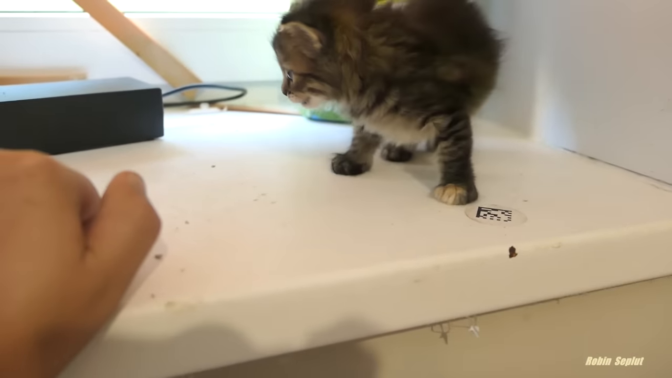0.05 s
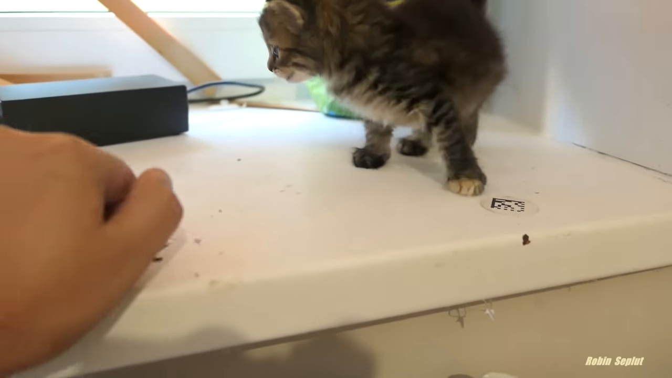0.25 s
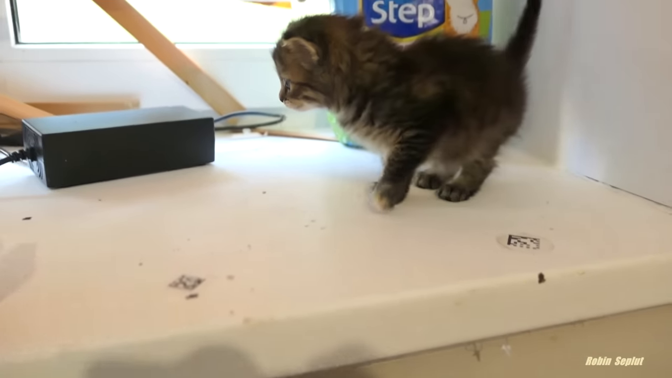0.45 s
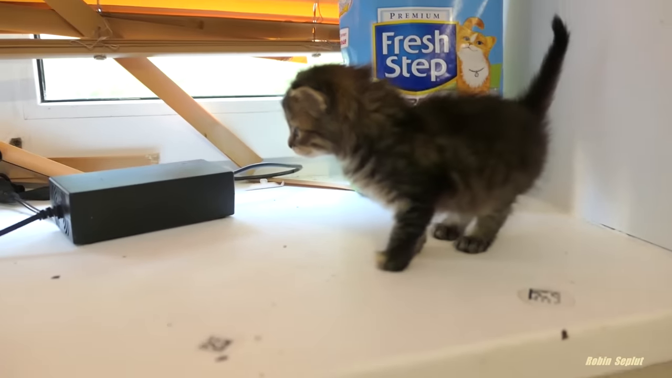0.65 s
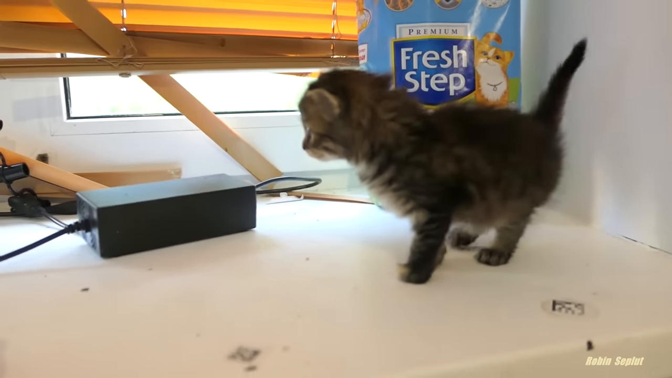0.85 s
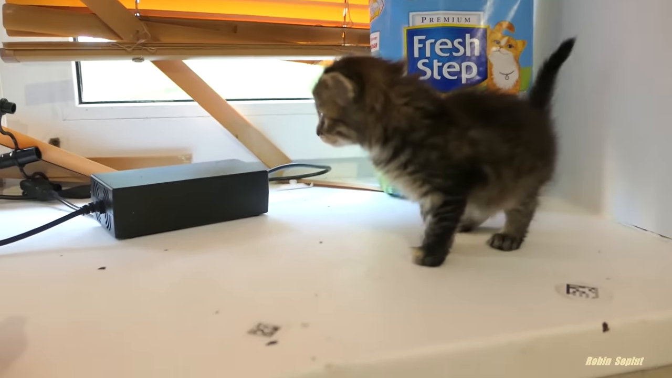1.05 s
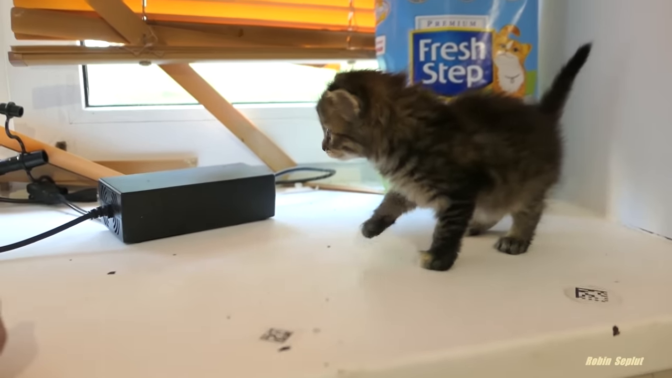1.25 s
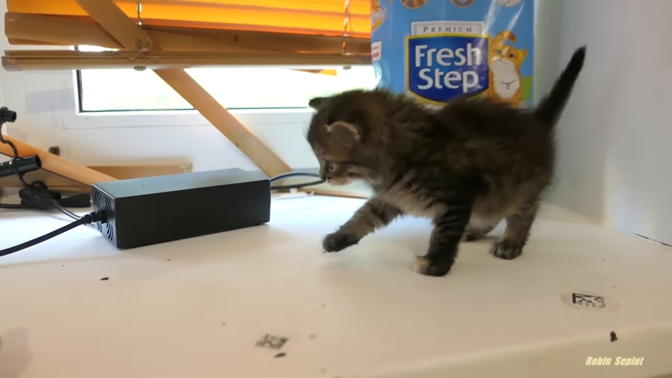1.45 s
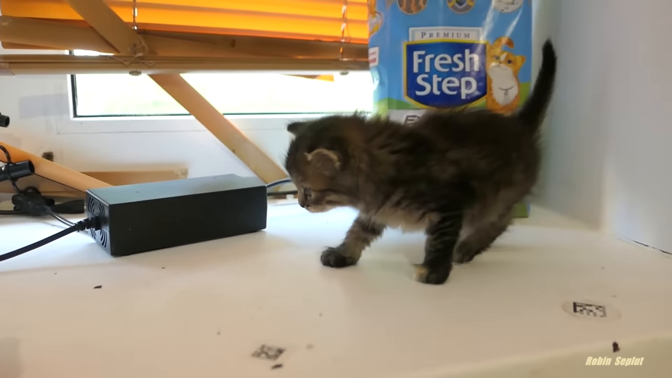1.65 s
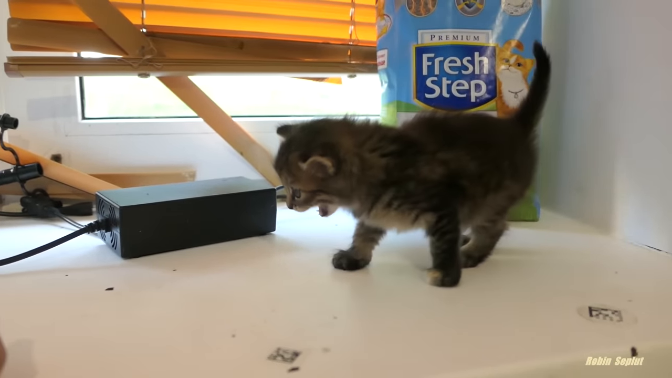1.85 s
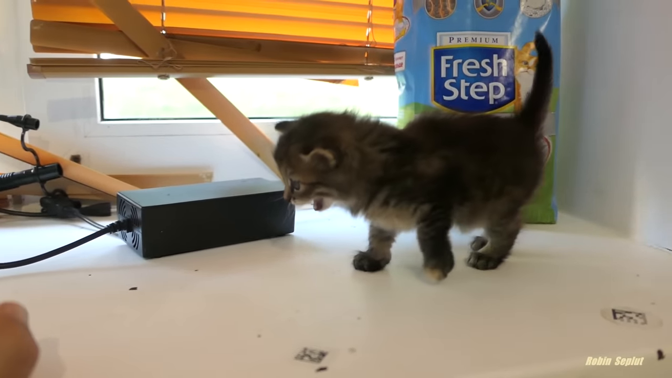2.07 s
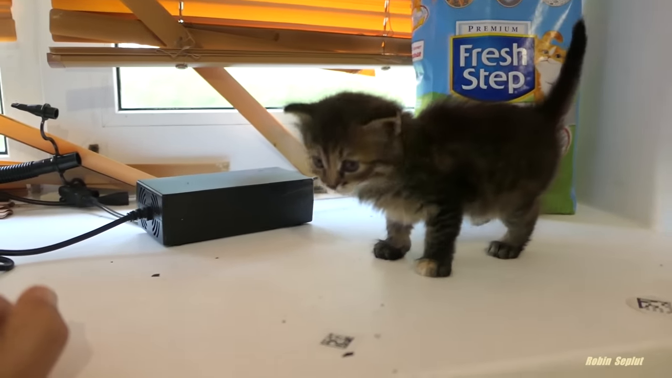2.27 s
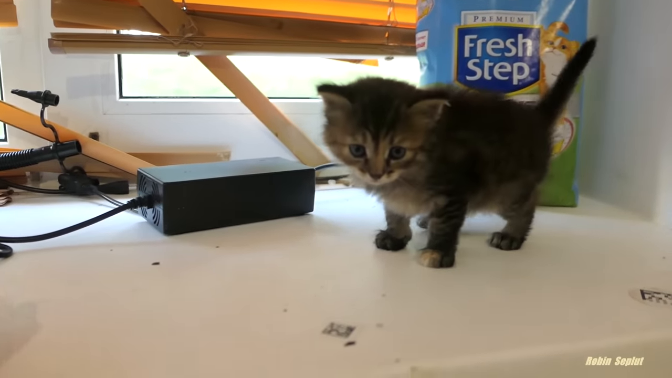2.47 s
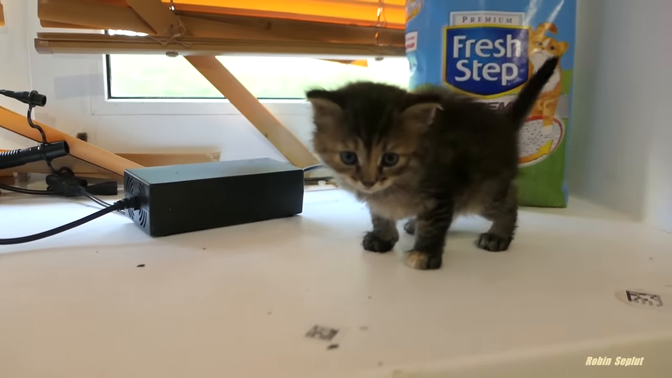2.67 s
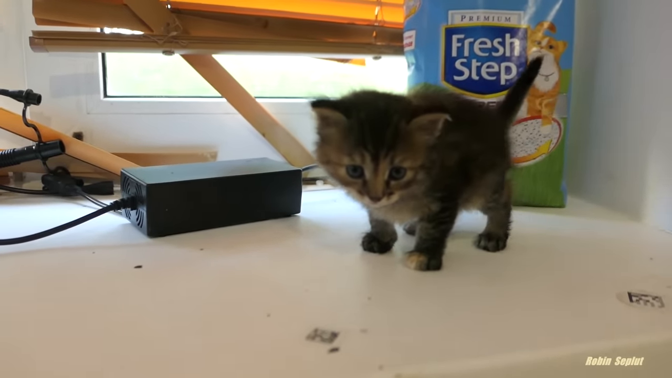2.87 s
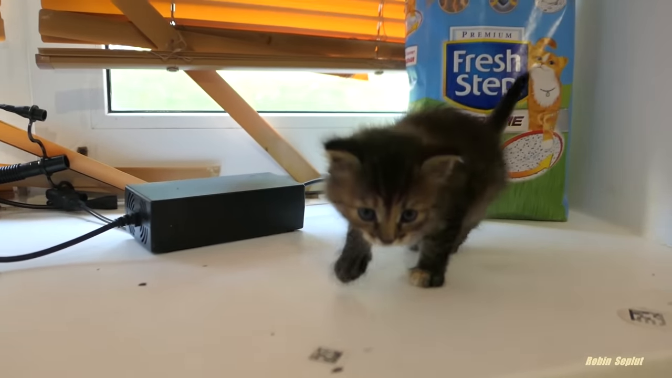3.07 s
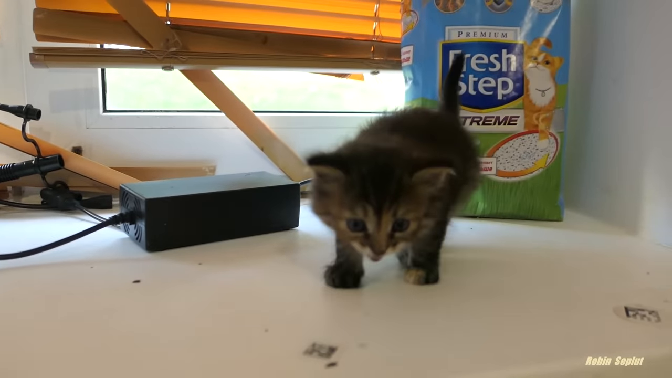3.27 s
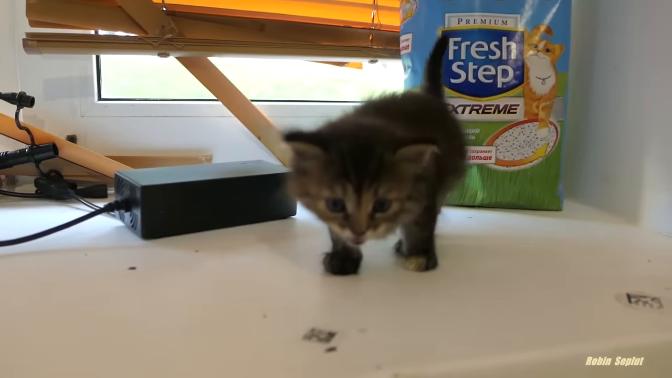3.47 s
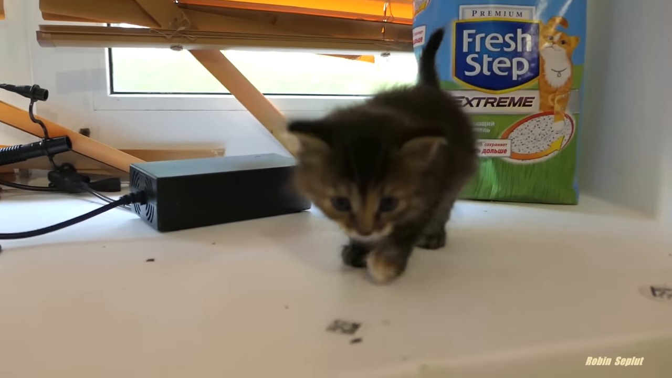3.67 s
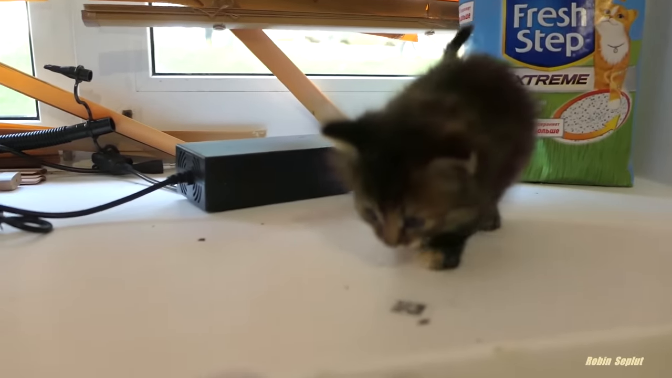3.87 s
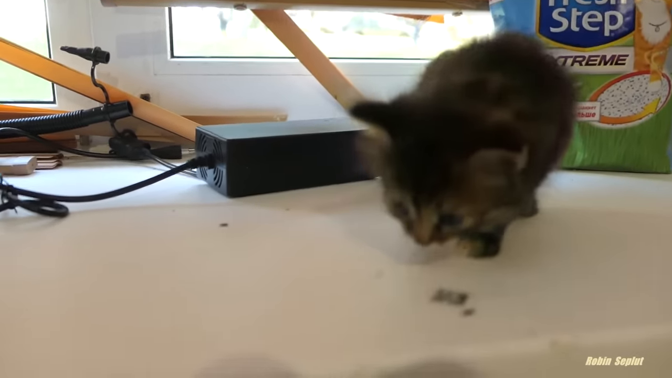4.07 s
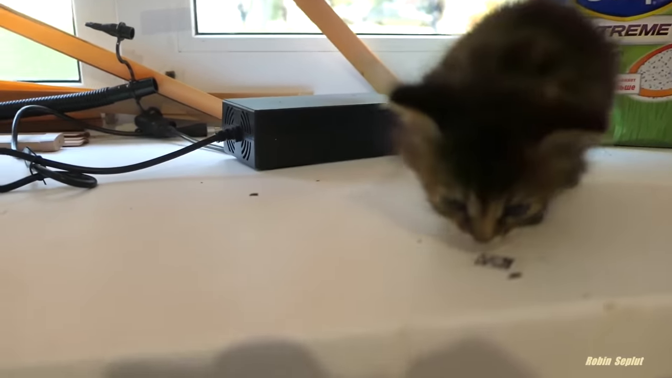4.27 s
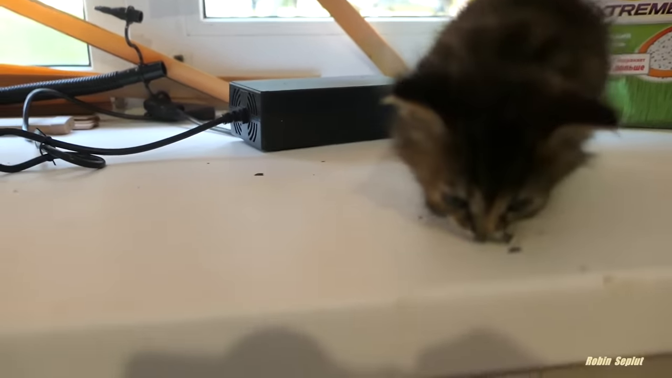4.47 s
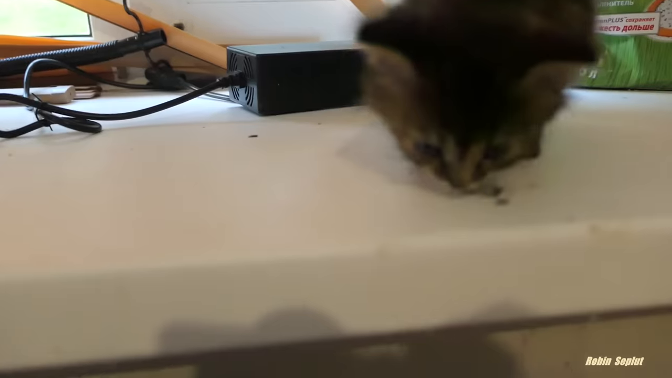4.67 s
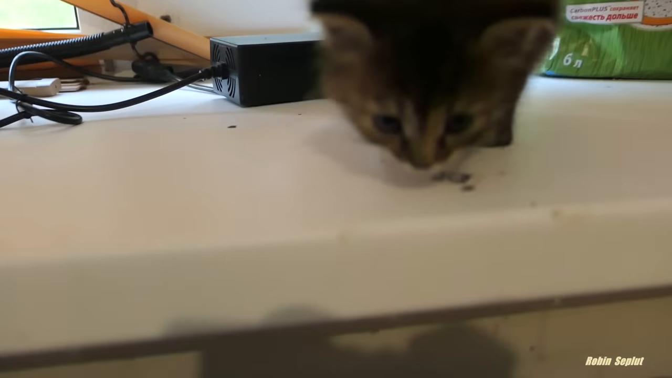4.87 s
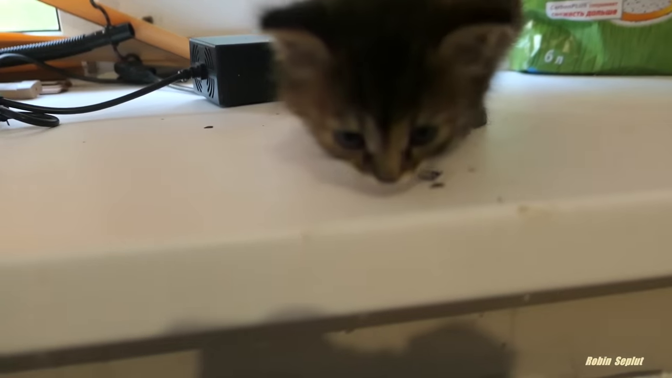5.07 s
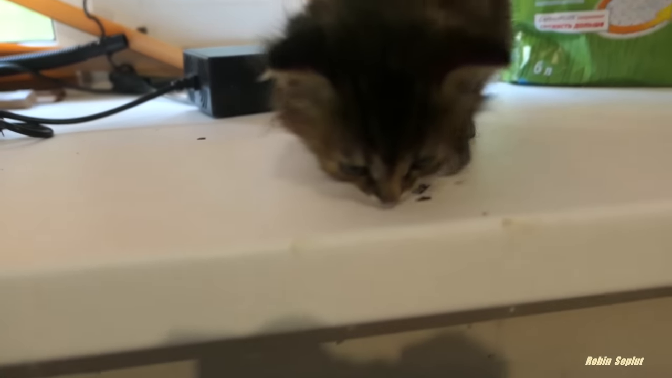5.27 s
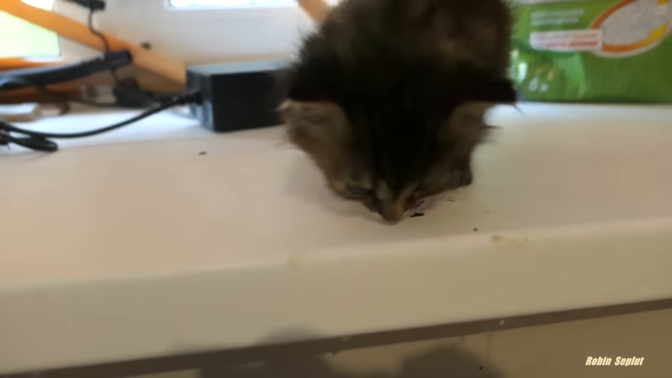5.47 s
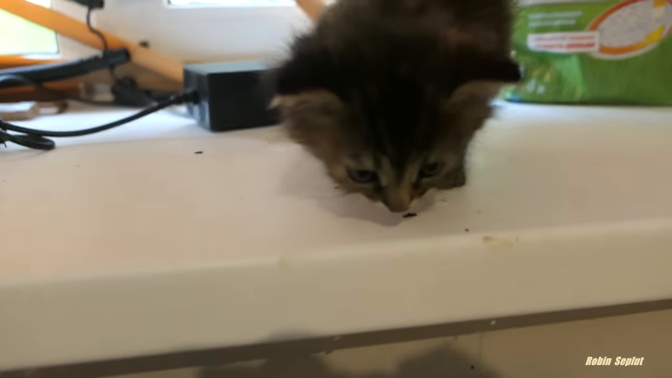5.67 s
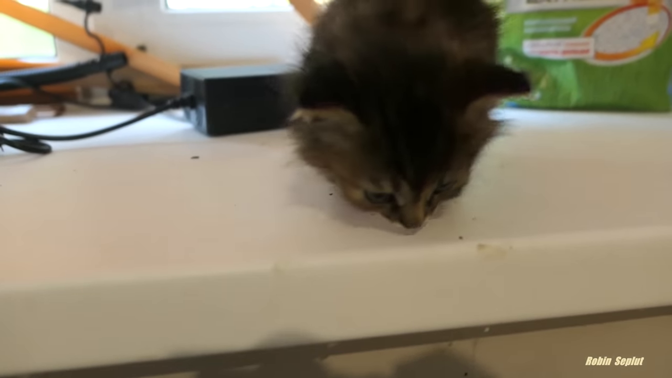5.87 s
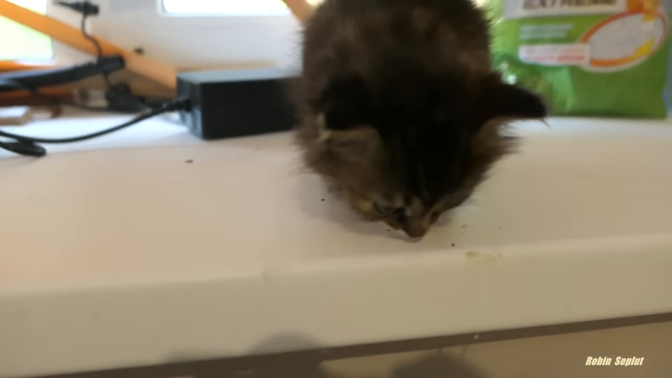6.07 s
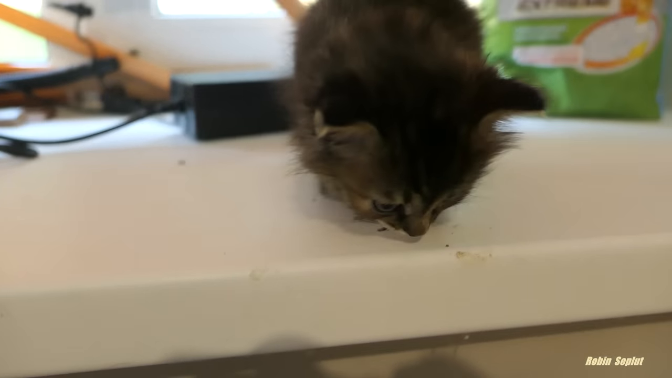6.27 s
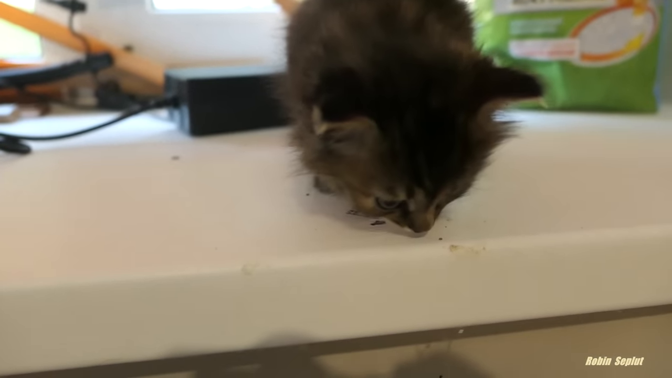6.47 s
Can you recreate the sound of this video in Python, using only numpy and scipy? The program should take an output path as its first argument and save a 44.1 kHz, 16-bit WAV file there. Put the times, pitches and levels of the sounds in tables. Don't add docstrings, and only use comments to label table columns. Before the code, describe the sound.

One hard wooden thump rings through a bare room, then a tiny kitten gives short, thin, raspy high cries over soft fan hum and traffic.

```python
import sys
import numpy as np
from scipy import signal
from scipy.fft import rfft, irfft
from scipy.io import wavfile
from scipy.ndimage import uniform_filter1d

SR = 44100
rng = np.random.default_rng(int(sys.argv[2]) if len(sys.argv) > 2 else 0)


def bounce(signal):
    frames = np.transpose(np.atleast_2d(signal))
    limited = np.clip(frames, -1, 1)
    pcm = np.round(limited * 32767).astype(np.int16)
    wavfile.write(sys.argv[1], SR, pcm)


def how_loud(loudness_db):
    steps = np.asarray(loudness_db, float) / 20
    return 10 ** steps


N = 287734


def evened(x):
    return x / np.sqrt(np.mean(x ** 2) + 1e-20)


def read(points, hz):
    f, value = np.transpose(points)
    return np.interp(np.log(hz + 1), np.log(f + 1), value)


def add(mix, start_s, sound):
    part = mix[:, round(start_s * SR):][:, :sound.shape[-1]]
    part += sound[..., :part.shape[1]]


def placed(sound, side_db):
    return np.array([sound * how_loud(side_db / 2), sound * how_loud(-side_db / 2)])


def drift(count, smooth):
    wander = rng.standard_normal(SR // 4)[:count]
    for _ in range(2):
        wander = uniform_filter1d(wander, int(smooth))
    return evened(wander)


# pitch_hz, likeness (-1 to 1)
LIKENESS = [(60, -0.57), (150, -0.66), (380, -0.65), (950, -0.15), (2380, -0.23), (5980, 0.51),
            (15000, 0.49)]
# pitch_hz, left_minus_right_db
LEFT_LEAN = [(60, 1.0), (180, -1.0), (550, 4.0), (1650, 2.0), (4970, 0.0), (15000, 0.0)]


def noise(shape_db, patchy_db):
    frames, hz = N // 512 + 5, np.fft.rfftfreq(2048, 1 / SR)
    a, b, c, d, patches = rng.standard_normal((frames, 1025, 5)).T
    patches = uniform_filter1d(patches, size=14, axis=0)
    patches = evened(uniform_filter1d(patches, size=7, axis=1))
    same = np.clip(read(LIKENESS, hz), -1, 1)[:, None]
    lean = how_loud(read(LEFT_LEAN, hz)[:, None] / 2)
    left = a + 1j * b
    right = same * left + np.sqrt(1 - same ** 2) * (c + 1j * d)
    z = np.array([left * lean, right / lean])
    z *= how_loud(shape_db(hz[:, None]) + patchy_db * patches)
    sound = signal.istft(z, nperseg=2048, noverlap=1536)[1]
    return evened(sound[:, 1024:N + 1024])


# pitch_hz, level_db (per Hz)
WASH = [(25, -35.5), (60, -30.5), (100, -33), (160, -1), (400, -2), (1000, -10.5), (2000, -18.5),
        (2700, -22), (4600, -25.5), (5300, -21.5), (7000, -23), (10000, -24.5), (13000, -29.5),
        (15800, -34)]


def steady_wash():
    return how_loud(-56.5) * noise(lambda hz: read(WASH, hz), patchy_db=0.3)


# pitch_hz, width_hz, level_db
DUCT = [(172, 95, -5), (612.3, 14.1, 6), (812.4, 50, 2.5), (1319, 138, -8.5), (1808, 113, -12)]


def fan_duct():
    def humps_db(hz):
        power = sum(how_loud(2 * db) / (1 + (2 * (hz - f) / width) ** 2) ** 2 for f, width, db in DUCT)
        return 10 * np.log10(power)
    return how_loud(-55) * noise(humps_db, patchy_db=0.4)


def passing(vehicles):
    t = np.arange(N) / SR
    power = sum(how_loud(2 * db) / (1 + ((t - nearest_s) / span_s) ** 2) ** 2 for nearest_s, db, span_s in vehicles)
    return np.sqrt(power)


# pitch_hz, level_db
STREET = [(150, -12), (300, 1), (550, -0.5), (1000, -9.5), (1350, 0.5), (1900, -13.5), (2400, -19),
          (3500, -28.5), (9000, -49)]
# nearest_s, level_db, passing_s
CARS = [(.15, -58, 0.35), (1.08, -54, 0.11), (2.05, -52.5, 0.26), (3.45, -55.5, 0.28), (3.88, -56.5, 0.061),
        (4.32, -53.5, 0.2), (5.79, -59.5, 0.21), (6.5, -58, 0.25)]


def street():
    return how_loud(4.5) * passing(CARS) * noise(lambda hz: read(STREET, hz), patchy_db=4.2)


# pitch_hz, level_db
WALLS = [(50, -33), (90, -24), (130, -1.5), (175, 0), (240, -13), (400, -43)]
# nearest_s, level_db, passing_s
LORRIES = [(1.7, -77, 1), (3.0, -69.5, 0.13), (3.6, -58, 0.15), (4.62, -65, .12), (5.9, -55, 0.24)]


def lorries():
    return how_loud(1.0) * passing(LORRIES) * noise(lambda hz: read(WALLS, hz), patchy_db=-1.0)


# pitch_hz, fade_s (time to fall 60 dB)
ROOM = [(100, 0.97), (300, 0.7), (1000, 0.73), (2000, .75), (3400, 0.58), (6000, 0.76), (9000, 0.37),
        (13000, 0.39)]


def room(x, gap_s, same):
    taps = np.zeros((2, SR))
    starts = np.arange(int(gap_s * SR), SR - 20, 20)
    at = starts + rng.integers(0, 20, (2, SR // 20))[:, :len(starts)]
    signs = rng.choice([-1., 1.], (2, SR // 20))[:, :len(starts)]
    np.put_along_axis(taps, at, signs, 1)
    same = np.clip(same, 0, 1)
    taps[1] = same * taps[0] + np.sqrt(1 - same ** 2) * taps[1]
    hz, t, z = signal.stft(taps, SR, nperseg=256)
    fading = how_loud(-60 * t / read(ROOM, hz)[:, None])
    tail = signal.istft(z * fading, SR, nperseg=256)[1]
    return signal.fftconvolve(x, tail / np.linalg.norm(tail[0]), axes=1)[:, :N]


# pitch_hz, level_db (per Hz)
WOOD = [(60, -91), (150, -6), (210, -8.5), (300, -6), (430, 0), (570, -3.5), (680, -10), (900, -4.5),
        (1050, -13), (1500, -24), (1800, -27), (2400, -37), (3700, -61.5), (9000, -60.5)]


def knock(db, side_db, ring_hz, bright_db, ring_db):
    t, hz = np.arange(SR // 4) / SR, np.fft.rfftfreq(SR // 4, 1 / SR)
    rise = t / 0.0031
    build = 1 - np.exp(-rise ** 2)
    timing = rfft(rng.standard_normal(len(t)) * rise ** 2 * np.exp(-rise))
    colour = how_loud(read(WOOD, hz) + bright_db * np.log2(hz / 500 + 0.00088))
    rattle = irfft(timing / abs(timing) ** 1.1 * colour, len(t)) * build * np.exp(-t / 0.036)
    swings = t * ring_hz
    ring = how_loud(ring_db - 60 * swings / 52) * build * np.sin(2 * np.pi * swings)
    return placed(how_loud(db) * (evened(rattle) / 11 + ring), side_db)


# start_s, level_db, side_db (left minus right), ring_hz
BLOWS = [
    (0.6214, -5.5, 1.5, 410),
    (2.524, -47.5, -2, 600),
    (2.815, -28, 3, 172),
]
# start_s, level_db, side_db (left minus right), ring_hz
TAPS = [(.318, -40, 1, 294.5), (2.451, -43, 2, 518), (3.829, -56, 10, 760), (3.93, -50.5, 8, 840),
        (4.695, -52, 15, 823), (5.122, -50, 4, 870), (5.478, -50, 9, 823), (6.279, -45, -1, 489)]


def knocks():
    far = np.zeros((2, N))
    for start_s, *how in BLOWS:
        add(far, start_s, knock(*how, bright_db=-0.14, ring_db=-19.5))
    for start_s, *how in TAPS:
        add(far, start_s, knock(*how, bright_db=7, ring_db=-2))
    return far


def tick(db, hz, ms):
    t = np.arange(1500) / SR
    snap = rng.standard_normal(len(t)) * np.exp(-t / (abs(ms) / 1000 + 1e-4))
    band = signal.butter(2, [hz / 5.2, min(hz * 1.64, 14000)], "band", fs=SR, output="sos")
    snap = signal.sosfilt(band, snap)
    return how_loud(db) * snap / abs(snap).max()


# start_s, level_db, pitch_hz (centre), length_ms
TICKS = [(0.237, -52, 9140, 3), (.303, -45.5, 6100, 7.3), (0.318, -43, 4940, 6.8),
         (0.622, -36.5, 5630, 7.5), (1.831, -40.5, 10200, 4), (1.844, -54, 7450, 1.7),
         (1.877, -38, 6600, 2.5), (2.45, -46, 3950, 16), (2.487, -49, 6100, 3.4), (2.525, -49, 5900, 31),
         (3.24, -35, 7250, 2.6), (3.589, -47, 3000, 2), (5.369, -48.5, 9900, 4.4), (5.644, -35, 7000, 2.3),
         (5.901, -29.5, 5430, 0.4), (5.905, -31.5, 7400, 0.4), (5.9195, -36, 5500, 0.97)]


def ticks():
    near = np.zeros((2, N))
    for start_s, *how in TICKS:
        add(near, start_s, tick(*how))
    return near


# pitch_hz, level_db
TEETH = [(2500, -45), (4300, -8), (5200, 5.5), (6600, 13), (7800, -11), (8800, -20), (10500, -1),
         (12500, -6), (15500, -13)]


def air_past_teeth(count):
    hz = np.fft.rfftfreq(count, 1 / SR)
    rush = rfft(rng.standard_normal(SR // 4)[:count])
    return evened(irfft(rush * how_loud(read(TEETH, hz)), count))


def hiss(length_s, first_db, last_db):
    u = np.linspace(0, 1, int(length_s * SR))
    near_loud = u if last_db > first_db else 1 - u
    level_db = min(first_db, last_db) + abs(last_db - first_db) * near_loud ** 2.8
    sputter = how_loud(level_db + 2.5 * drift(len(u), 60))
    return sputter * air_past_teeth(len(u)) * signal.windows.tukey(len(u), 0.15)


# start_s, length_s, first_db, last_db
HISSES = [
    (1.817, 0.064, -63, -48),
    (3.191, 0.053, -63, -61),
    (5.586, 0.056, -66, -41),
    (5.895, 0.061, -57, -56),
]


def hisses():
    near = np.zeros((2, N))
    for start_s, *how in HISSES:
        add(near, start_s, hiss(*how))
    return near


def cry(rows, mouth, breath_db, wobble=0.0052, jitter=0.0044, shimmer_db=1.9):
    s, *columns = np.transpose(rows)
    t = np.arange(s[0], s[-1], 1 / SR)
    hz, effort_db, shut = (np.interp(t, s, c) for c in columns)
    effort_db = effort_db - 8 * np.clip(1 - (t - t[0]) / 0.008, 0, 1)
    third_db = -21.5 + (3.5 + 21.5) * shut
    chest_db = -45 + 4 * shut - effort_db + 0.28 * (effort_db + 51)
    trembling = 1 + wobble * drift(len(t), 150) + jitter * drift(len(t), 29)
    turns = np.cumsum(hz * trembling) / SR
    level_db = {int(round(k)): db for k, db in mouth}
    core = np.sqrt(sum(how_loud(2 * level_db[k]) for k in (5, 6, 7)))
    voice = np.zeros(len(t))
    for k, db in level_db.items():
        if k == 1:
            gain = how_loud(chest_db + db)
        elif k == 3:
            gain = how_loud(third_db)
        elif k in (2, 4):
            gain = how_loud(db + 14 * shut) / core
        else:
            gain = how_loud(db) / core
        shimmer = how_loud(shimmer_db * drift(len(t), 146))
        voice += gain * shimmer * np.sqrt(2) * np.cos(2 * np.pi * k * turns + 0.241 * k * k)
    pulses = 1 + 0.5 * np.cos(2 * np.pi * turns)
    voice += how_loud(breath_db) * air_past_teeth(len(t)) * pulses
    edge = np.clip(np.minimum(t - t[0], t[-1] - t) / 0.001, 0, 1)
    return placed(how_loud(effort_db) * voice * edge, side_db=1.1)


# time_s, pitch_hz, effort_db, mouth closing (0 open, 1 shut)
RISING = [(1.875, 1090, -35.5, 0), (1.894, 1077, -32.5, .1), (1.906, 1120, -31, 0),
          (1.958, 1124, -31, 0.25), (1.963, 1169, -31.5, 0.2), (2.003, 1165, -36, 0),
          (2.022, 1162, -38, 0.8), (2.062, 1214, -44, 0.95), (2.084, 1227, -45.5, 0.75)]
LEVEL = [(3.238, 1126, -37.5, 0.19), (3.278, 1074, -37, 0.22), (3.345, 1080, -38, 0.53),
         (3.359, 1109, -39.5, 0.24), (3.372, 1058, -36.5, 0.52), (3.385, 1134, -43, 0.64),
         (3.419, 1114, -39, 0.37), (3.433, 1066, -38.5, 0.17), (3.449, 1116, -51, .25)]
CHIRP = [(3.588, 1129, -44.5, 1.26), (3.601, 1104, -49.5, 1.05), (3.609, 1155, -48, 1.05),
         (3.62, 1156, -49, 0.87)]
WAVERING = [(5.642, 1042, -33.5, 0.26), (5.664, 1047, -32, 0.38), (5.679, 1004, -29.5, .35),
            (5.693, 1067, -32.5, 0.69), (5.708, 1052, -33, 0.78), (5.717, 1098, -38.5, 0.99),
            (5.736, 1126, -35.5, 0.97), (5.756, 1085, -35.5, 0.83), (5.766, 1062, -39, .95)]
AFTERNOTE = [(5.765, 1069, -42, 0.75), (5.774, 1125, -40.5, 1), (5.8, 1086, -43, 0.79),
             (5.813, 1175, -49, 0.9), (5.821, 1172, -57, 0.87), (5.827, 1117, -66, .5),
             (5.836, 1106, -54, 0.43), (5.852, 1150, -64, 0.61)]
# overtone number, level_db
MOUTHS = [
    [(1, -9.5), (2, -31), (3, -11), (4, -18), (5, -5), (6, -8), (7, -18.5), (8, -21.5), (9, -19.5),
     (10, -35), (11, -24), (12, -24), (13, -34), (14, -47)],
    [(1, -8.5), (2, -16), (3, -10), (4, -7), (5, 2), (6, -2), (7, -1.5), (8, -9.5), (9, -9.5), (10, -20),
     (11, -21), (12, -22), (13, -29), (14, -28)],
    [(1, 0), (2, -28), (3, -3), (4, -27), (5, -7.5), (6, -12), (7, -21), (8, -19), (9, -25), (10, -33),
     (11, -40), (12, -31), (13, -20), (14, -40.5)],
    [(1, -8), (2, -15), (3, 0), (4, -13.5), (5, 7), (6, 8.5), (7, 7), (8, -4), (9, -8), (10, -4), (11, -5),
     (12, -26), (13, -13), (14, -35)],
]
BREATH_DB = [-14.5, 1, -13, -13, -17]


def kitten_cries():
    near = np.zeros((2, N))
    cries = [RISING, LEVEL, CHIRP, WAVERING, AFTERNOTE]
    for rows, mouth, breath_db in zip(cries, MOUTHS + MOUTHS[-1:], BREATH_DB):
        add(near, rows[0][0], cry(rows, mouth, breath_db))
    return near


def scene():
    background = lorries() + steady_wash() + fan_duct() + street()
    far = knocks()
    wood = how_loud(-1.0) * far + how_loud(-2.0) * room(far, gap_s=0.01, same=0.86)
    no_bass = signal.butter(4, 115, "high", fs=SR, output="sos")
    wood = signal.sosfilt(no_bass, wood)
    near = ticks() + hisses() + kitten_cries()
    kitten = how_loud(-2.5) * near + how_loud(-8.5) * room(near, gap_s=0.006, same=0.73)
    return kitten + wood + background


def band_limit(x):
    return signal.sosfilt(signal.butter(12, 15750, fs=SR, output="sos"), x)


def record(dry):
    lag_s, top_hz = 7e-6, 15900
    hz = np.fft.rfftfreq(N, 1 / SR)
    ports = np.exp(1j * np.pi * hz * lag_s * np.array([[1], [-1]]))
    edge = np.clip((top_hz - hz) / 300, 0, 1)
    mix = irfft(rfft(dry) * ports * edge, N)
    return band_limit(mix)


dry = scene()
out = record(dry)
bounce(out)
```